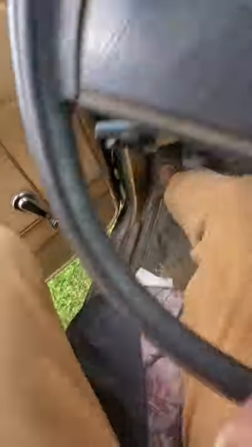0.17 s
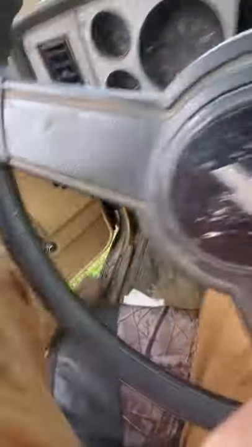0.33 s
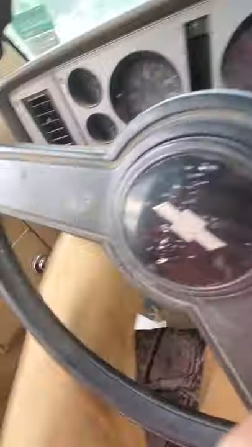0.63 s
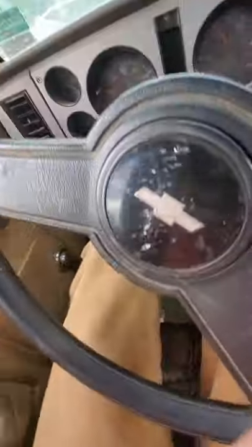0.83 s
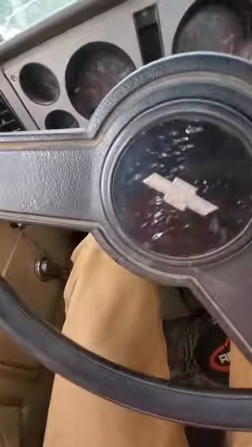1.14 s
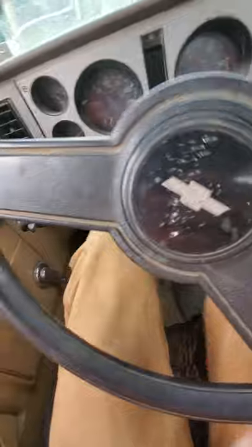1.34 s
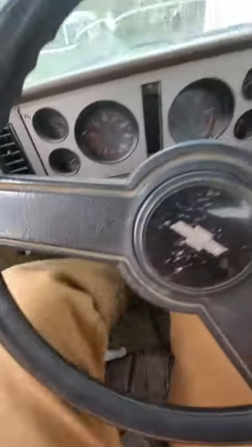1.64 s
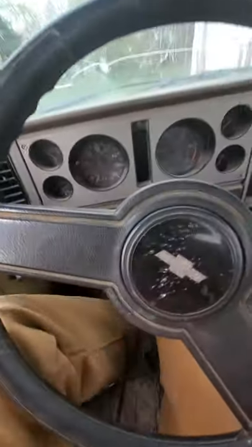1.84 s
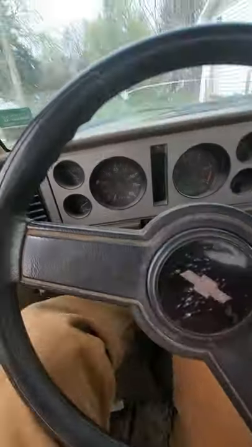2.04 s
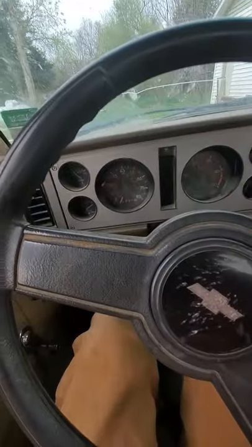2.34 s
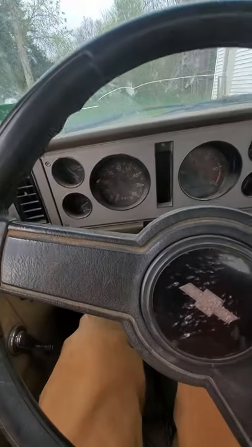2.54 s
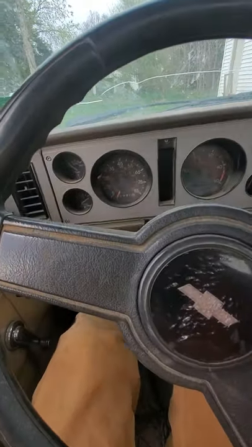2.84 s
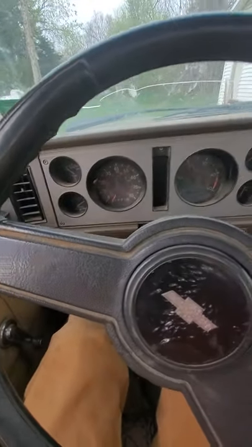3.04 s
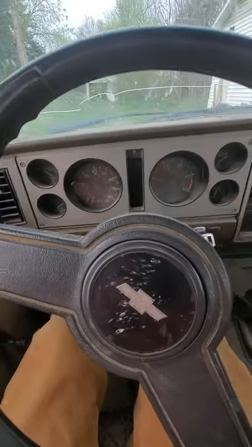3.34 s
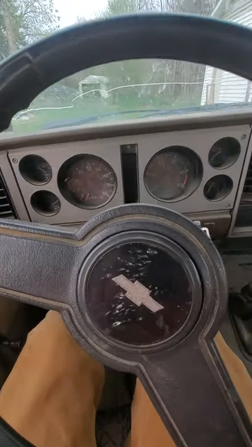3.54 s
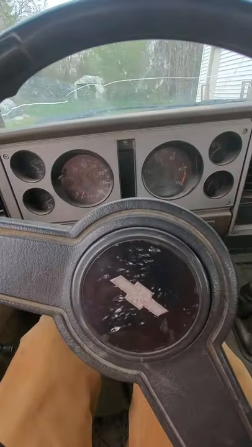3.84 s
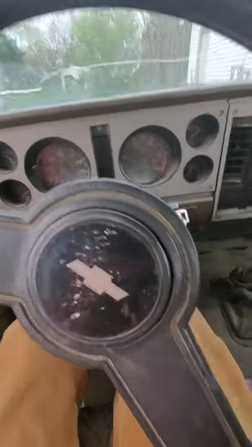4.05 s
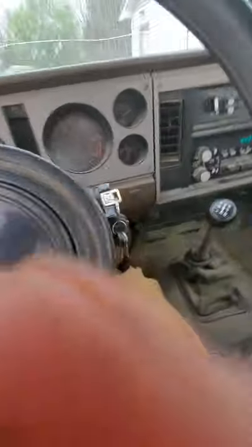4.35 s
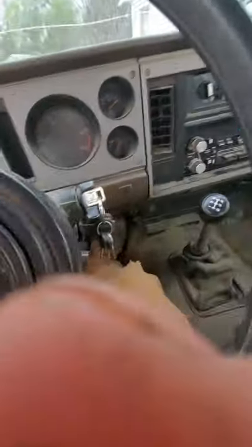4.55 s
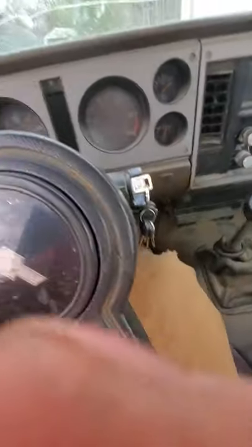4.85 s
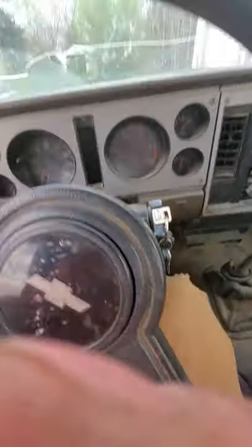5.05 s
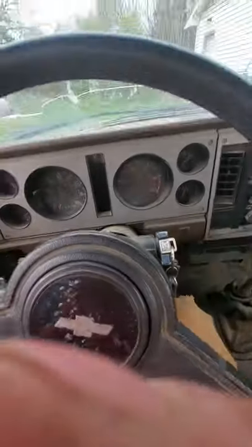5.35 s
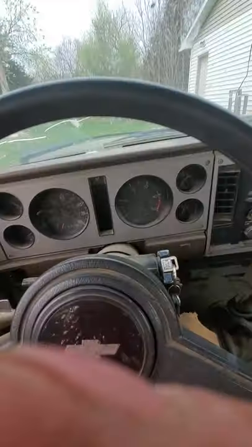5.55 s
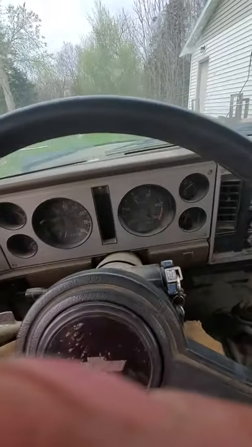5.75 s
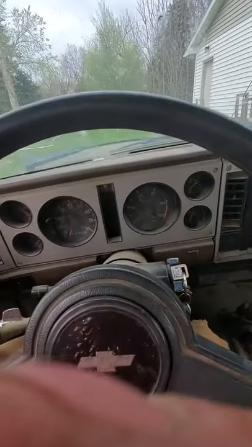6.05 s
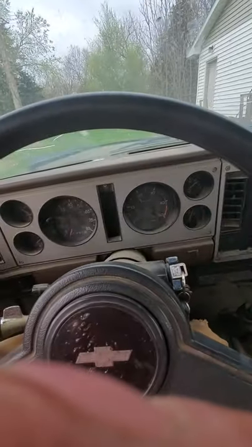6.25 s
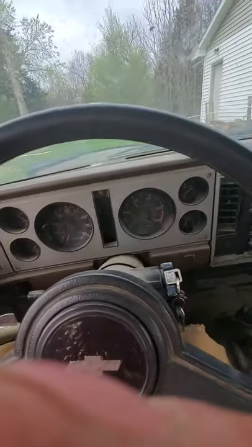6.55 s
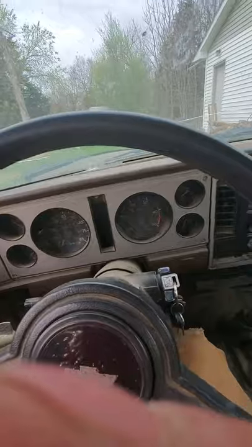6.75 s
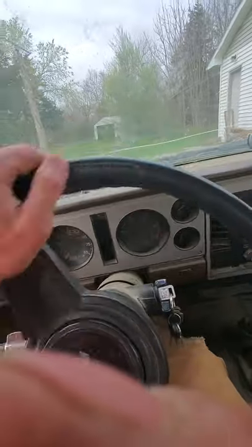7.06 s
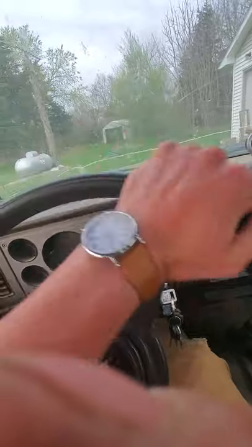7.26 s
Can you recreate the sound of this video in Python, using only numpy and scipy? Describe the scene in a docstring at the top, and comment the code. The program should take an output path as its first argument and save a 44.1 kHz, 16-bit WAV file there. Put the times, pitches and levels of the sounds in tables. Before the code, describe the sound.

In a small pickup cab, a handheld stereo microphone hears a four-cylinder diesel idling at about thirty firings a second. At 0 seconds its bright, knocking clatter enters through the open door, easing as the microphone swings inside, amid clothes rustling and dashboard buzz. At 0.9 the door slams: deep thump, steel latch ring and rattling panel, with a catch dropping at 1.1. Outside clatter is shut out; the level ducks, holds, and recovers around 2.2 to 2.7. A seat slide at 1.3, trim rattle at 3.0 and buzzing follow. Faint high bird whistles come from the left at 3.6-4.6; fingers rub and bump the camera on the right at 4.1-4.4. From 5 the clutch drags the engine slower and rougher, with a seat groan at 6.3 and small clicks. Near 7 the throttle opens, knocking hardens, speed rises, the body shudders and the steering wheel judders in rapid hissing slips until 7.4.

```python
"""In the cab of a four-cylinder diesel pickup, heard from the driver's seat. The engine is a low throb, a drone of
sine waves and shaped noise that knocks with each firing. The door slams, ringing steel and shaking loose parts; it
shuts out the clatter, and the camera's limiter ducks, holds and recovers. The dashboard buzzes, clothes rustle, a
hand bumps the camera and a bird whistles. The clutch drags the engine down, then the throttle opens, the cab
shudders and the steering wheel judders as the truck moves off."""
import sys
import numpy as np
from scipy import signal
from scipy.fft import rfft, irfft, next_fast_len
from scipy.io import wavfile
from scipy.ndimage import uniform_filter1d, minimum_filter1d

SR = 44100
rng = np.random.default_rng(int(sys.argv[2]) if len(sys.argv) > 2 else 0)


def master(y):
    """Save y as 16-bit WAV."""
    cut = np.clip(np.atleast_2d(y).T, -1, 1)
    pcm = np.round(cut * 32767)  # scale
    wavfile.write(sys.argv[1], SR, pcm.astype(np.int16))


N = 326340
T = np.arange(N) / SR  # time (s)

# how much louder the left microphone port is than the right: f/Hz, left minus right level/dB
LEFT_SIDE = [(180, -15), (380, 1), (700, 6.5), (1300, 12), (2400, 18), (4400, 42), (8100, 50.5),
             (15000, 24)]
# tone of rattling trim: f/Hz, relative level/dB
RATTLE_TONE = [(2000, -28), (3300, 4), (3900, -0.5), (4700, -10.5), (6400, -9), (7400, -23), (9500, -26)]
# how hard each cylinder knocks, in firing order: strength (-1 to 1)
CYLINDERS = np.array([1, .5, -1, -.5])
THROTTLE_RISE_S = 0.26  # how long the throttle takes to open


def amp(db):
    """Turn decibels into gain."""
    return 10 ** (np.asarray(db) / 20)


def unit(x):
    """Scale x to an rms of 1."""
    return x / np.sqrt(np.mean(x ** 2) + 1e-20)


def along(points, hz):
    """Read (f/Hz, value) points at any frequency, on a log axis."""
    f, v = np.transpose(points)
    return np.interp(np.log(hz + 1), np.log(f + 1), v)


def wobble(rate):
    """A smooth random curve with rate random points a second."""
    knots = rng.standard_normal(int(N * rate / SR) + 4)
    smooth = signal.resample(knots, len(knots) * 10)
    return np.interp(T * rate * 10, np.arange(len(smooth)), smooth)


def ramp(start, length):
    """Rise from 0 to 1 over length seconds."""
    return np.clip((T - start) / length, 0, 1)


def noise():
    """Two unrelated white noises."""
    return rng.standard_normal((2, N))


def grainy(depth_db):
    """Two noises broken up by the contacts of chattering parts."""
    return unit(noise() * amp(depth_db * wobble(450)))


def filtered(x, response):
    """Multiply the spectrum of x by a response that depends on frequency."""
    size = next_fast_len(N + SR // 4, True)
    hz = np.fft.rfftfreq(size, 1 / SR)
    return irfft(rfft(x, size) * response(hz), size)[..., :N]


def colour(x, spectrum, size=8192):
    """Give x a tone with a filter of unit energy that never sounds early and falls steeply beyond its ends."""
    hz = np.fft.rfftfreq(size, 1 / SR) + 1
    octaves_beyond = np.abs(np.log2(hz / np.clip(hz, spectrum[0][0], spectrum[-1][0])))
    gain = amp(along(spectrum, hz) - 24 * octaves_beyond)
    # folding the cepstrum forward in time gives a minimum-phase filter
    cepstrum = irfft(np.log(gain + 1e-6))
    cepstrum[1:size // 2] *= 2
    cepstrum[size // 2 + 1:] = 0
    response = irfft(np.exp(rfft(cepstrum)))
    return signal.oaconvolve(x, response[None] / np.linalg.norm(response), axes=1)[:, :N]


def placed(x, balance):
    """Share a sound between left and right, frequency by frequency; it reaches the left port first."""
    lead_s = .00045
    side = np.array([[-1], [1]])

    def response(hz):
        share = 2 / (1 + amp(side * along(balance, hz)))
        return share * np.exp(-1j * np.pi * hz * lead_s * side)

    return filtered(x, response)


def ports(pair, balance):
    """Turn two unrelated sounds into left and right: alike in the bass, then shared out by balance."""
    # how alike the two ports sound before sharing: f/Hz, likeness (0 to 1)
    alike = [(100, 0.81), (290, 0), (640, 0), (1400, 0.75)]

    def response(hz):
        turn = np.arccos(np.clip(along(alike, hz), -1, 1)) / 2
        return np.array([np.ones_like(hz), np.tan(turn)])

    mid, side = filtered(pair, response)
    return placed(np.array([mid + side, mid - side]), balance)


def resonances(modes, f):
    """Response of parts that ring at their own pitches, given as (f/Hz, width/Hz, gain)."""
    return sum(gain * 1j * f * w / (hz * hz - f * f + 1j * f * w) for hz, w, gain in modes)


def rung(x, modes):
    """Hear x only through ringing (f/Hz, width/Hz, level/dB) modes."""
    return filtered(x, lambda f: resonances([(hz, w, amp(db)) for hz, w, db in modes], f))


def panels(x, modes):
    """Metal parts boost x at their own pitches, whatever shakes them."""
    return filtered(x, lambda f: 1 + resonances([(hz, w, amp(db) - 1) for hz, w, db in modes], f))


def echoed(x, t60, wet):
    """Add a short tail of close reflections, keeping about the same power."""
    t = np.arange(SR // 4) / SR
    tail = rng.standard_normal(len(t)) * amp(-60 * t / t60)
    reflections = signal.oaconvolve(x, tail[None] / np.linalg.norm(tail), axes=1)[:, :N]
    return (x + wet * reflections) / np.hypot(1, wet)


def bursts(rows, spectrum):
    """Each (t/s, level/dB, t60/s) blow is sudden dense chatter that fades by 60 dB in t60."""
    power, t = np.zeros(N + SR), np.arange(SR // 2) / SR
    for s, db, t60 in rows:
        power[round(s * SR):][:len(t)] += amp(db - 60 * t / t60) ** 2
    return colour(np.sqrt(power[:N]) * grainy(depth_db=1.5), spectrum)


def ringing(rows, modes, attack):
    """Each (t/s, level/dB) strike rings the same modes, at slightly varied levels, fading by 60 dB in t60."""
    out, t = np.zeros(N + SR), np.arange(SR // 2) / SR
    for s, db in rows:
        ring = np.zeros(len(t))
        for hz, level, t60 in modes:
            ring += amp(level + rng.normal(0, 1) - 60 * t / t60) * np.sin(2 * np.pi * hz * t)
        out[round(s * SR):][:len(t)] -= amp(db) * ring * (1 - np.exp(-t / attack))
    return out[:N]


def strokes(rows, rise_s, fall_s):
    """Gain of (t/s, length/s, level/dB) movements: swell by 20 dB in rise_s, hold, fade by 20 dB in fall_s."""
    power = np.zeros(N)
    for s, length, db in rows:
        away = np.maximum((s - T) / rise_s, (T - s - length) / fall_s)
        near = away < 4  # ignore anything 80 dB down
        power[near] += amp(db - 20 * np.maximum(away[near], 0)) ** 2
    return np.sqrt(power)


def bird():
    """Gliding and level sine tones: a thin high note, a clean peep, quick falling whistles, a little yard echo."""
    # falling whistles: t/s, level/dB before echo and left-right gain
    whistles = [(3.752, -53), (3.882, -52.5), (4.012, -54), (4.54, -57)]
    # level notes, same level scale: t/s, half length/s, f/Hz, waver/Hz, level/dB
    peeps = [(3.57, .07, 6100, 330, -60), (3.645, .006, 4700, 0, -50)]
    from_hz, to_hz, length_s = 5200, 3400, .03
    out, u = np.zeros(N + SR), np.linspace(0, 1, int(length_s * SR))
    glide = from_hz * (to_hz / from_hz) ** u
    for s, db in whistles:
        pitch = glide * (1 + .04 * wobble(400)[:len(u)])
        tone = np.sin(2 * np.pi * np.cumsum(pitch) / SR)
        out[round(s * SR):][:len(u)] += amp(db) * np.sin(np.pi * u) ** .5 * tone
    song = out[:N]
    for s, half_length, hz, waver_hz, db in peeps:
        swell = np.exp(-((T - s) / half_length) ** 2)
        pitch = hz + waver_hz * wobble(300)
        song = song + amp(db) * swell * np.sin(2 * np.pi * np.cumsum(pitch) / SR)
    return echoed(song[None], t60=.09, wet=.7) * amp([[5], [-15]])  # mostly on the left


def hand():
    """Fingers rub and bump the camera beside its right port; a bump is one soft push that rings its body."""
    # rubs, before left-right gain: t/s, length/s, level/dB
    rubs = [(4.14, 0.23, -48), (4.36, 0.023, -42)]
    # finger bumps, before left-right gain: t/s, level/dB, contact/s
    bumps = [(4.1105, 5, .00042), (4.1345, 3, .0008), (4.385, 6, .0015)]
    # tone of a bump: f/Hz, relative level/dB
    bump_tone = [(80, 9), (560, -13.5), (1100, -24), (3500, -25.5)]
    # ring of the camera body, relative to the bump: f/Hz, level/dB, t60/s
    case = [(76.6, -52, 0.066), (463, -33, 0.045), (570, -32, 0.019)]
    rub_tone = [(80, 13.5), (450, -7.0), (1600, -5.5), (3000, -12.5), (9000, -45)]
    rub = colour(strokes(rubs, rise_s=0.075, fall_s=0.058) * noise(), rub_tone)
    pushes = np.zeros((1, N))
    for s, db, contact in bumps:
        push = np.hanning(int(contact * SR))
        pushes[0, round(s * SR):][:len(push)] = -amp(db) * push / push.sum()
    body = ringing([row[:2] for row in bumps], case, attack=.001)
    return ((rub + colour(pushes, bump_tone))[0] + body) * amp([[-11], [4.5]])  # left, right


def judder():
    """The turning wheel sticks and slips, each slip a fading hiss; for a while every second one rings the trim."""
    # ring of each slip: f/Hz, relative level/dB per Hz
    slip_tone = [(3500, -3), (4800, -12), (6500, 0), (7300, -12)]
    start_s, slips_per_s, decay_s = 7.04, 38.4, .009
    slip_db, grab_db = -47.5, -43.5  # starting levels, doubled as the turn gathers pace
    slip, since_slip = np.divmod(T - start_s, 1 / slips_per_s)
    effort = (T > start_s) * (1 + ramp(start_s, THROTTLE_RISE_S))
    fading = np.exp(-since_slip / decay_s)
    # odd-numbered slips grab, and the ring carries on through the next slip
    since_grab = since_slip + (slip + 1) % 2 / slips_per_s
    grab = (slip > 1) * (slip < 13) * np.exp(-since_grab / (2 * decay_s))
    slips = colour(amp(slip_db) * effort * fading * noise(), slip_tone)
    return slips + colour(amp(grab_db) * effort * grab * noise(), RATTLE_TONE)


def cab():
    """Shaped noise for cloth, seat, clicks, loose trim and the shudder of pulling away, plus the juddering wheel."""
    # rustles of the driver's clothes: t/s, length/s, level/dB
    moves = [(0, 0.29, -43.5), (.37, 0.064, -42), (.5, 0.35, -53), (1.15, 0.53, -54.5), (1.75, 0.63, -58.5),
             (4.12, 0.45, -60.5), (4.86, 0.052, -60.5), (6.15, 0.7, -64.5), (6.95, 0.082, -55.5),
             (7.13, 0.21, -51.5)]
    # tone of cloth and clicks: f/Hz, relative level/dB
    rustle_tone = [(1500, 8), (3500, -0.5), (6600, 4.5), (7400, -10), (8700, 0.5), (10000, 4),
                   (12500, -4.5), (15500, -17)]
    # a leg slides on the seat: t/s, length/s, level/dB
    slides = [(1.33, 0.16, -49.5), (6.25, 0.069, -59)]
    # the seat groans under a shift of weight: t/s, length/s, level/dB
    groans = [(6.26, 0.21, -45.5)]
    # the body shudders as the truck pulls away: t/s, length/s, level/dB
    shudders = [(7.01, 0.026, -27.5), (7.14, 0.049, -27), (7.3, 0.22, -25.5)]
    # small clicks of the keys and controls: t/s, level/dB, t60/s
    ticks = [(2.75, -47, 0.02), (4.427, -43.5, 0.086), (6.12, -48.5, 0.048), (6.48, -46.5, 0.078)]
    # rattles of loose trim: t/s, level/dB, t60/s
    trim = [(1.257, -43, .04), (3.016, -36.5, 0.075), (7.01, -47, 0.2), (7.125, -40, 0.3)]
    still_db = -70  # cloth between movements
    movement = np.hypot(amp(still_db), strokes(moves, rise_s=0.16, fall_s=0.098))
    cloth = colour(movement * amp(1.34 * wobble(60)) * noise(), rustle_tone)
    sliding = strokes(slides, rise_s=0.078, fall_s=0.29) * amp(1.4 * wobble(70))
    seat = colour(sliding * noise(), RATTLE_TONE)
    groan = colour(strokes(groans, rise_s=0.024, fall_s=0.1) * grainy(depth_db=0), [(350, 3), (700, -6.5)])
    shudder_tone = [(45, 4), (85, 0), (150, -21), (410, -16), (600, -31.5)]
    shudder = colour(strokes(shudders, rise_s=0.038, fall_s=0.15) * noise(), shudder_tone)
    clicks = bursts(ticks, rustle_tone) + bursts(trim, RATTLE_TONE)
    return ports(cloth + seat + groan + shudder + judder() + clicks, LEFT_SIDE)


def door():
    """Steel latch and sealing cab ring as fading sines; panel and window rattle on, and the catch drops home."""
    # thumps as door lands and rebounds, a foot is set down, the truck lurches: t/s, level/dB added to each mode
    thumps = [(.8945, 11.5), (.985, -4), (1.33, -20), (7.142, -19), (7.352, -18)]
    # modes of the cab as the door seals it: f/Hz, level/dB, t60/s
    cab_modes = [(50.8, -2, 0.089), (120.8, -16.5, 0.24), (171.6, -16.5, 0.3), (211.6, -7, 0.06),
                 (304, -24, 0.36)]
    # strikes of the steel latch, and keys clinking as the truck moves off (last row): t/s, level/dB added to
    # each mode
    strikes = [(.883, -20), (.895, -1), (.904, -3), (7.123, -32)]
    # modes of the latch: f/Hz, level/dB, t60/s
    latch_modes = [(8067, -4, .04), (8190, -3, .04), (8334, -4, .045), (8470, -6, .04)]
    # blows on the door panel: t/s, level/dB before the panel boost, t60/s
    blows = [(.889, -16.5, 0.29), (.904, -4, 0.3), (.936, -6.5, 0.37), (.996, -13, 0.41),
             (1.025, -12, 0.22)]
    # tone of the blows: f/Hz, relative level/dB
    crash_tone = [(60, 3), (190, -16), (250, -25), (330, -12.5), (500, -28.5), (850, -25.5), (3840, -33.5),
                  (6700, -38.5), (7400, -48), (9500, -39.5), (15500, -56)]
    # sheet metal of the door: f/Hz, width/Hz, boost/dB
    sheet_metal = [(2016, 9, 5), (2736, 13, 6)]
    # the catch drops home after the slam: t/s, level/dB before its modes, t60/s
    catch_drop = [(1.091, -21.5, .1)]
    # modes of the catch: f/Hz, width/Hz, level/dB
    catch_modes = [(2700, 220, 1.5), (4100, 240, -2.5), (8530, 510, 2.5)]
    # the slam between the ports: f/Hz, left minus right level/dB
    door_side = [(130, -11.5), (290, -3.5), (640, 6), (1410, 10.5), (3100, 23), (6820, 41), (15000, 25)]
    thump = ringing(thumps, cab_modes, attack=.005)
    latch = ringing(strikes, latch_modes, attack=.004)
    rattle = echoed(panels(bursts(blows, crash_tone), sheet_metal), t60=.09, wet=.3)
    catch = rung(bursts(catch_drop, [(2000, 0), (10000, 0)]), catch_modes)
    return placed(thump + latch, LEFT_SIDE) + ports(rattle + catch, door_side)


def dashboard(firings, shaking):
    """Shaking and jolts buzz loose parts; each firing favours different ones, so the pitch of the rattle shifts."""
    # loudest jolts: t/s, level/dB
    jolts = [(.279, -42), (.314, -41), (2.714, -49), (2.849, -47), (3.252, -48), (3.287, -47), (4.64, -48)]
    # loose parts: f/Hz, relative level/dB
    loose_parts = [(1600, -3), (2150, 0), (2560, 0)]
    width_hz, scatter_db = 240, 3
    for s, db in jolts:
        jolt = amp(db) * (T >= s) * np.exp(-np.abs(T - s) / .013)
        shaking = np.hypot(shaking, jolt)
    parts = []
    for hz, db in loose_parts:
        favour = amp(db + scatter_db * rng.standard_normal(1000))[firings.astype(int)]
        # one resonance, cut steeply above 3100 Hz
        ring = lambda f: resonances([(hz, width_hz, 1)], f) / (1 + (f / 3100) ** 10)
        parts.append(filtered(favour * shaking * noise(), ring))
    return np.sqrt(np.mean(shaking ** 2)) * unit(sum(parts))


def knocks(firings, decay, between, second, uneven_db, scatter_db):
    """Envelope of rms 1: a rounded knock per firing, a weaker one half-way; two of four cylinders knock harder."""
    index = firings.astype(int)
    strength = amp(uneven_db * CYLINDERS[index % 4] + scatter_db * rng.standard_normal(1000)[index])
    knock = lambda u: np.exp(-u / decay) * (1 - np.exp(-10 * u))
    return unit(between + strength * (knock(firings % 1) + second * knock((firings + .5) % 1)))


def cyclic(firings, fresh, count=5900):
    """Vibration that repeats with every four firings, with a share that is new each time."""
    position = (firings / 4 % 1 * count).astype(int)
    cycle = rng.standard_normal((2, count))[:, position]
    return unit(cycle + fresh * grainy(depth_db=-0.5))


def combustion(firings, count=3):
    """Each firing is a hard uneven blow, then weaker slaps of piston and valves; all ring the firewall."""
    # modes of the firewall: f/Hz, width/Hz, relative level/dB
    firewall = [(435, 30, -1), (630, 30, -6), (705, 40, -1), (1525, 30, -11), (1620, 22, -11)]
    scatter_db, jitter_s = 2, .0005  # the random delay of later slaps is a multiple of jitter_s
    slap_s, slap_loss_db = .006, 3  # each slap's delay and loss after the blow before it
    at = np.flatnonzero(np.diff(firings.astype(int)))
    strength_db = CYLINDERS[firings[at + 1].astype(int) % 4] + scatter_db * rng.standard_normal(len(at))
    blows = np.zeros((2, N + SR))
    for k in range(count):
        for port in blows:
            late = k * slap_s + (1 + k) ** 2 * jitter_s * rng.random(len(at))
            port[at + (late * SR).astype(int)] += amp(strength_db - slap_loss_db * k)
    muffled = filtered(blows[:, :N], lambda hz: 1 / (1 + (hz / 1750) ** 10))
    return unit(echoed(rung(muffled, firewall), t60=.09, wet=.5))


def drone(firings, rate, half_db, waver_db, unsteady, count=30):
    """Sines at multiples of half the firing rate sweep through the cab's fixed boom; odd ones waver more."""
    # boom of the cab: f/Hz, relative level/dB
    cab_boom = [(44, -1), (60, -8.5), (77, 4), (90, -0.5), (118, -14.5), (148, -9), (163, -2), (180, -4),
                (194, 1), (210, -13), (238, -8.5), (270, -22), (325, -19), (450, -32)]
    out, angle = np.zeros(N), np.pi * (firings + unsteady * wobble(12))
    for k in np.arange(count) + 3:
        odd = k % 2  # half orders, shifted by half_db
        level = along(cab_boom, rate * k / 2) + half_db * odd + waver_db * (1 + odd) * wobble(7)
        out += amp(level) * np.cos(k * angle + 2 * np.pi * rng.random())
    return unit(out)


def engine():
    """Firing throb, cab drone and diesel clatter follow speed and load; the open door lets the bright clatter in."""
    # steady idle until the clutch drags the engine down: t/s, firings per second
    speed = [(4.95, 29.6), (5.2, 29.06), (5.5, 26.33), (6.0, 25.09), (6.4, 23.1), (7.03, 22.4), (7.4, 26.5)]
    # rumble of the floor: f/Hz, relative level/dB per Hz
    rumble_tone = [(22, -17.5), (48, -3), (80, -3), (120, -5), (170, -5), (270, -18), (335, -17),
                   (440, -20)]
    # clatter with the door open: f/Hz, relative level/dB
    open_tone = [(280, -2), (440, -5), (560, -10), (800, -9), (1170, -15.5), (2600, -21.5), (3800, -25.5),
                 (8000, -46)]
    # clatter with the door shut: f/Hz, relative level/dB
    shut_tone = [(330, 2.5), (700, -4.5), (1100, -9), (1600, -12), (2600, -17.5), (2900, -18.5),
                 (6500, -32.5)]
    # spells in which the dashboard shakes loose: t/s, length/s, level/dB
    buzz_spells = [(0, .7, -58.5), (2.48, 2.16, -60), (5.62, .48, -61.5)]
    # base levels (dB) at idle with the door shut
    throb_base_db, drone_db, rumble_db = -26.5, -33.5, -40
    knock_base_db, clatter_db, buzz_db = -53.5, -49, -72

    rate = np.interp(T, *np.transpose(speed))
    firings = 3.8 + np.cumsum(rate) / SR  # running count
    labour = (rate[0] - rate) / np.ptp(rate)  # a dragged engine runs rougher
    door_open = 1 - ramp(.9, .1)
    clutch = ramp(4.62, 0.18)  # it takes up the load
    throttle = ramp(6.9, THROTTLE_RISE_S)
    doorway_db = 6 * np.exp(-T / 0.19)  # louder until the camera swings in from the doorway
    boom_db = 2.5 * door_open + doorway_db / 2 + 1.5 * throttle
    knock_db = 6 * door_open + doorway_db + 8 * throttle - 3.46 * clutch

    # the throb fades by 29.5 dB for each halving of speed
    throb_db = throb_base_db + 29.5 * np.log2(rate / rate[0]) - 0.67 * door_open
    throb_waver_db = (-0.5 + 2.4 * labour) * wobble(20)
    throb = amp(throb_db + throb_waver_db) * unit(np.cos(2 * np.pi * firings))
    hum_gain = amp(drone_db + boom_db + 2 * labour + wobble(30))
    hum = hum_gain * drone(firings, rate, half_db=-7, waver_db=1.3, unsteady=.006)
    rumble = amp(rumble_db + boom_db + 2 * labour) * colour(noise(), rumble_tone)

    ignitions = firings + .12
    knock = amp(knock_base_db + knock_db) * combustion(ignitions)
    clatter = amp(clatter_db + knock_db) * knocks(
        ignitions, decay=.38, between=.55, second=.15, uneven_db=1.2, scatter_db=2.5)
    inside = colour((1 - door_open) * clatter * cyclic(firings, fresh=0.61), shut_tone)
    outside = colour(door_open * clatter * cyclic(firings, fresh=0.96), open_tone)

    # the dashboard buzzes in spells, a little early or late on each firing
    chatter = knocks(
        firings + .05 * wobble(30), decay=.36, between=.08, second=.2, uneven_db=2, scatter_db=2.8)
    looseness = np.hypot(amp(buzz_db), strokes(buzz_spells, rise_s=0.14, fall_s=0.101))
    buzz = dashboard(firings, looseness * chatter)
    return placed(throb + hum, LEFT_SIDE) + ports(rumble + knock + inside + outside + buzz, LEFT_SIDE)


def scene():
    """Everything in and around the cab, over a faint hiss."""
    hiss = amp(-84.0) * noise()
    return hiss + bird() + hand() + cab() + door() + engine()


def limiter(x):
    """A peak near full scale turns the gain down at once; the cut is held, then released at a steady rate."""
    largest_cut_db, hold_s, recover_db_per_s = 9.5, 1.264, 19
    ceiling, look_ahead = .9, int(.003 * SR)
    peak = np.abs(x).max(axis=0)
    needed_db = np.clip(20 * np.log10(ceiling / (peak + 1e-9)), -largest_cut_db, 0)
    hold = int(hold_s * SR)
    # the origin makes the hold look back in time only
    held_db = minimum_filter1d(needed_db, hold, origin=(hold - 1) // 2, mode="nearest")
    recovery_db = recover_db_per_s * T
    gain_db = np.minimum.accumulate(held_db - recovery_db) + recovery_db
    return x * amp(uniform_filter1d(minimum_filter1d(gain_db, look_ahead), look_ahead))


def record(dry):
    """The camera limits, clips at full scale and keeps nothing from 15800 Hz up."""
    return filtered(np.clip(limiter(dry), -1, 1), lambda hz: hz < 15800)


dry = scene()
out = record(dry)
master(out)
```